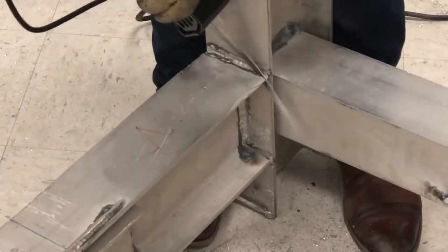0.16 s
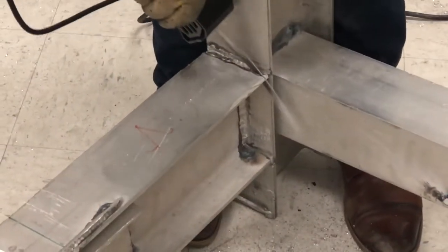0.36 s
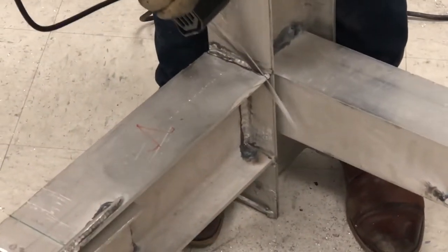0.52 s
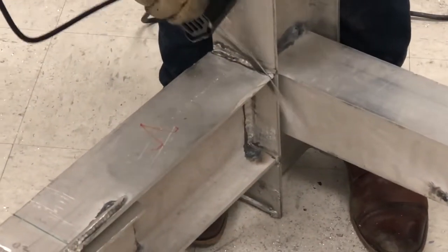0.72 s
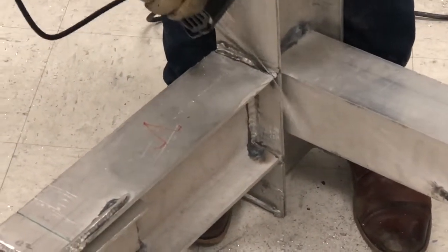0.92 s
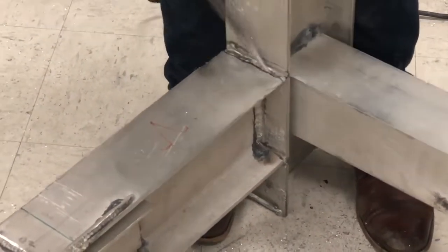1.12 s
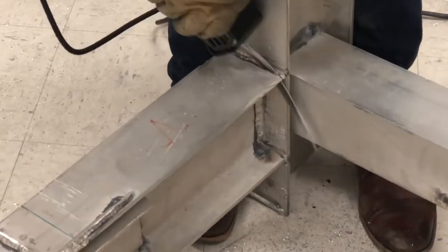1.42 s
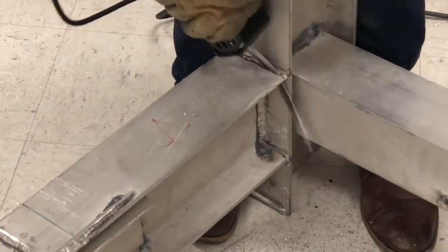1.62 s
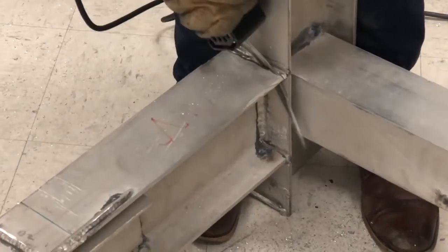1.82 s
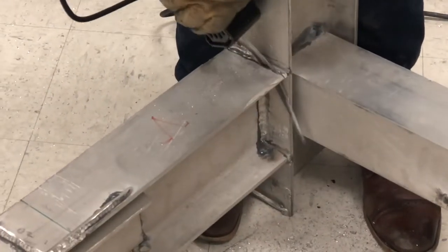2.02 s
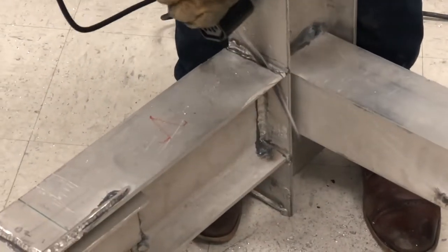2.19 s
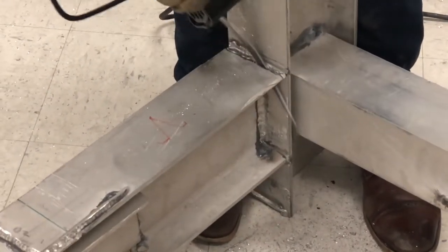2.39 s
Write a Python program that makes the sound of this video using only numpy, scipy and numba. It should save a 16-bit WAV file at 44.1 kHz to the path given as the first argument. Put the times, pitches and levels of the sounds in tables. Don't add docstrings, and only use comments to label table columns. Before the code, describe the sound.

Reciprocating saw blade chatters and squeals through a metal beam, eases off mid-cut, then resumes cutting

```python
import sys
import numpy as np
from scipy import signal
from scipy.fft import rfft, irfft
from scipy.io import wavfile
from scipy.ndimage import uniform_filter1d
from numba import njit

SR = 44100
rng = np.random.default_rng(int(sys.argv[2]) if len(sys.argv) > 2 else 0)


def volts(x):
    e = np.asarray(x, float) / 20
    return 10 ** e


def wav_record(signal):
    frames = np.transpose(np.atleast_2d(signal))
    bounded = np.clip(frames, -1, 1)
    quanta = np.round(bounded * 32767).astype(np.int16)
    wavfile.write(sys.argv[1], SR, quanta)


N = 112454

FULL_PRESSURE_DB = -49.5


def level(x):
    return x / np.sqrt(np.mean(x ** 2))


@njit
def svf(x, hz, width):
    y, band, low = np.empty(len(x)), 0., 0.
    for i in range(len(x)):
        g, damping = np.tan(np.pi * hz[i] / SR), width / hz[i]
        v = (band + g * (x[i] - low)) / (1 + g * (g + damping))
        band, low, y[i] = 2 * v - band, low + 2 * g * v, damping * v
    return y


def fixed_band(x, hz, width_hz):
    return svf(x, np.full(N, float(hz)), float(width_hz))


def walk(rate):
    k = int(SR / rate)
    steps = np.repeat(rng.standard_normal(N // k + 1), k)
    return level(uniform_filter1d(uniform_filter1d(steps, k), k)[:N])


def colour(x, table):
    hz, db = np.array(table, float).T
    f = np.log(np.arange(1, N // 2 + 2) * SR / N)
    outside = np.maximum(np.log(hz[0]) - f, 0) + np.maximum(f - np.log(hz[-1]), 0)
    gain_db = np.interp(f, np.log(hz), db) - 41 * outside * (f < np.log(9000))
    return irfft(rfft(x) * volts(gain_db), N)


def swells(t, table):
    return sum(db * np.exp(-((t - s) / half) ** 2) for s, half, db in table)


def room(x):
    t60_s = 0.31
    t = np.arange(int(.5 * SR)) / SR
    tail = rng.standard_normal(len(t)) * volts(-60 * t / t60_s) * (t > .006)
    return signal.fftconvolve(x, tail / np.sqrt(np.sum(tail ** 2)))[:N]


def blade_strokes(t):
    # time_s, strokes_per_s
    stroke = [
        (0, 83.2),
        (1.05, 82.8),
        (1.3, 84),
        (1.6, 80.6),
        (1.9, 81.2),
        (2.55, 81.8),
    ]
    rate = np.interp(t, *np.array(stroke).T) * (1 + 0.003943 * walk(4))
    return 2 * np.pi * np.cumsum(rate) / SR


def hand_pressure(t):
    # time_s, pressure_db, brightness_db, shake_db
    pressure = [(0.0, -39.5, -5, -21.5), (0.38, -44, -3, -21.5), (0.57, -45.5, -2.5, -16),
                (0.6, -47, -1, -26.5), (0.72, -46, -3.5, -16.5), (0.97, -43.5, -4.5, -21),
                (1.01, -47, -1, -24), (1.06, -46.5, -10.5, -10.5), (1.13, -47, 0, -9),
                (1.18, -46.5, -3, -11.5), (1.3, -58.5, -3.5, -12.5), (1.32, -50, -4.5, -16.5),
                (1.42, -55, -3, -10), (1.54, -46, -1, -16), (1.89, -45.5, -2.5, -17.5),
                (1.98, -44.5, -2, -14.5), (2.29, -44, -3, -15.5), (2.55, -45.5, -3.5, -17)]
    times, *curves = np.array(pressure).T
    return [np.interp(t, times, curve) for curve in curves]


def catches(t):
    # start_s, half_length_s, level_db
    catch_table = [(0.179, 0.017, -3), (.205, 0.011, 2), (0.39, 0.031, 3), (0.5, 0.011, -4),
                   (0.537, 0.016, 2), (0.782, 0.035, 3), (0.823, 0.02, -3.5), (0.845, 0.011, 5),
                   (1.008, 0.018, -3), (1.05, 0.026, 6), (1.133, 0.0065, -7), (1.245, 0.0075, 6),
                   (1.303, 0.0099, -1), (1.427, 0.007, -4.5), (1.838, 0.021, -2), (1.987, 0.023, 0.5),
                   (2.083, 0.014, 1), (2.117, 0.0073, -0.5), (0.457, 0.0086, 2), (2.378, 0.026, 1),
                   (2.444, 0.032, -2)]
    return swells(t, catch_table)


def second_cut(t):
    centre_s, change_s = 1.438, 0.095
    return np.clip(.5 + (t - centre_s) / change_s / 2, 0, 1)


def teeth(phase):
    teeth_per_s, scatter_db, biggest_bite = 9000, 2.5, 2.5
    hit, side, size = rng.random((3, N))
    bite_db = -scatter_db * np.maximum(np.log(1 - size), -biggest_bite)
    clicks = (hit < teeth_per_s / SR) * np.sign(side - .5) * volts(bite_db)
    stroke_db = 1.1 * np.cos(phase) + 1.0 * np.cos(2 * phase)
    return level(clicks * volts(stroke_db))


def rings(drive, modes):
    total = 0
    for hz, width, db in modes:
        fed = drive * volts(2.5 * walk(8.9))
        pitch = np.minimum(hz * (1 + 0.0039 * walk(5.3)), .45 * SR)
        total = total + volts(db) / np.sqrt(width) * svf(fed, pitch, 1. * width)
    return level(total)


def rasp(drive, table):
    x = colour(drive, table)
    low, high = table[0][0], table[-1][0]
    bands = low * 2 ** (np.arange(-1, 3 * np.log2(high / low) + 2) / 3)
    return level(sum(fixed_band(x * volts(1.5 * walk(13.79)), min(f, .45 * SR), f / 2) for f in bands))


def crossfade(first, second, late):
    return np.sqrt(1 - late) * first + np.sqrt(late) * second


def slips(t):
    # start_s, level_db, decay_s
    slip_table = [
        (1.055, -58.5, 0.26),
        (1.13, -65, 0.095),
        (1.5, -61.5, 0.21),
    ]
    rise_s = 0.0088
    env = 0
    for s, db, decay in slip_table:
        fall_db = db - 60 * np.maximum(t - s, 0) / (3 * decay)
        env = env + volts(fall_db) * np.clip((t - s) / rise_s, 0, 1)
    rumble = rng.standard_normal(N) * volts(2 * walk(40.3))
    return env * level(fixed_band(rumble, 386, 520))


def motor_hum(phase, late):
    # stroke_multiple, first_cut_db, second_cut_db
    partials = [(1, -30, -28), (2, -31, -32), (3, -17, -16), (4, -17, -17), (5, -11, -14), (6, -13, -22),
                (7, -15, -12), (8, -17, -15), (9, -26, -16), (10, -14, -14), (11, -16, -13), (12, -16, -13)]
    return sum(volts(a + (b - a) * late + 2.4 * walk(5.13)) * np.sin(k * phase + 6 * rng.random())
               for k, a, b in partials)


def frame_ring(t, bites, late):
    # time_s, pitch_hz
    ring_pitch = [
        (1.5, 491),
        (1.7, 545),
        (1.8, 640),
        (2.0, 660),
        (2.1, 660),
    ]
    ring = level(svf(bites, np.interp(t, *np.array(ring_pitch).T), 30.))
    ends = np.clip((2.1 - t) * 10, 0, 1)
    return late * ends * volts(-3) * ring


def shaken_frame(t, phase, bites, late):
    # frequency_hz, level_db
    frame_colour = [(15, -66), (25, -18), (183, -16), (242, -7), (361, -5.5), (409, -1), (649, 2.5),
                    (769, -2.5), (1000, 4.5), (1300, -22), (2200, -120)]
    rattle = volts(-1) * rasp(teeth(phase), frame_colour)
    return rattle + motor_hum(phase, late) + frame_ring(t, bites, late)


def squeals(t):
    # centre_s, half_length_s, pitch_hz, level_db
    squeal_table = [(.14, .045, 2752, 0), (.14, .03, 2915, -4), (.65, .04, 3113, -9), (.76, .02, 3340, -8),
                    (.4, .025, 1700, -7), (.16, .05, 2005, -7), (.42, .05, 1185, -13),
                    (.56, .045, 1192, -10), (.66, .025, 1192, -12), (.6, .03, 2755, -1),
                    (.76, .06, 2090, -8), (.85, .06, 1195, -9), (.97, .05, 1188, -9), (.96, .03, 2764, -2),
                    (1.07, .04, 2760, -1), (.99, .055, 408, -17), (1.23, .03, 8600, -7),
                    (1.335, .02, 8600, -9), (1.6, .025, 1195, -12), (1.78, .03, 1200, -16),
                    (1.91, .04, 1200, -14), (2.0, .03, 1200, -12), (2.1, .11, 1384, -13),
                    (2.13, .07, 407, -18), (2.41, .04, 1200, -10), (2.46, .1, 407, -16),
                    (2.4, .03, 2355, -7), (.11, .03, 1190, -18), (.09, .08, 415, -22), (.29, .04, 412, -22),
                    (.7, .07, 415, -19), (.25, .06, 835, -20), (.35, .05, 905, -22), (1.67, .03, 540, -18),
                    (1.97, .04, 655, -15), (2.03, .05, 560, -18), (1.8, .17, 243, -24),
                    (2.25, .13, 243, -28), (2.14, .03, 1195, -16), (2.26, .04, 407, -20),
                    (1.63, .03, 3110, -8), (1.68, .02, 3505, -8), (2.07, .03, 3505, -9),
                    (.86, .025, 2355, -8), (.6, .04, 2090, -9), (2.0, .06, 9880, -14),
                    (2.38, .04, 11300, -11)]
    # centre_s, half_length_s, pitch_hz, level_db
    whine = (1.95, .28, 12750, -16)
    total = 0
    for s, half, hz, db in squeal_table + [whine]:
        swell = volts(db) * np.exp(-((t - s) / half) ** 4)
        pitch = hz + 5 * walk(30) * hz / 1200
        grain = volts(1.2 * walk(25) + np.sqrt(hz / 1500) * walk(150))
        total = total + swell * np.sin(2 * np.pi * np.cumsum(pitch) / SR) * grain
    return total


def beam(bites, late, pressure):
    # pitch_hz, width_hz, level_db
    first_modes = [(1190, 30, -12), (1990, 190, -3), (2090, 30, -4), (2355, 30, -5), (2750, 70, -1),
                   (2915, 45, -2), (3113, 30, -5), (3330, 45, -6), (3514, 30, -7.5), (3690, 25, -8.5),
                   (3900, 90, -10)]
    # pitch_hz, width_hz, level_db
    second_modes = [(1206, 40, -8.5), (1524, 16, -6.5), (1795, 35, -2), (2235, 110, 4.5), (2325, 51, -1.5),
                    (2760, 57, 0.5), (3120, 59, -1), (3505, 81, 1.5), (3830, 48, -1)]
    # frequency_hz, level_db
    rasp_colour = [(410, -39), (700, -26), (1090, -17.5), (1180, -5.5), (1460, -5), (2020, 3), (2480, -3.5),
                   (2810, -1), (5000, -13.5), (6500, -28.5), (11000, -120)]
    drive = colour(bites, [(835, 0), (9000, 0)])
    ringing = crossfade(rings(drive, first_modes), rings(drive, second_modes), late)
    damped = bites - late * 0.22 * fixed_band(bites, 2080, 270)
    body = volts(-7.5) * ringing + volts(-4) * rasp(damped, rasp_colour)
    lift_db = -0.4 * np.minimum(pressure - FULL_PRESSURE_DB, 0)
    return body - fixed_band(body, 1140, 570) * (1 - volts(lift_db))


def dull_air(t, top, pressure, catch):
    # start_s, half_length_s, level_db
    spray = [(0.463, 0.013, 2), (.69, .04, 0), (1.104, .035, -9), (1.216, .035, -4), (1.597, 0.11, -3),
             (1.357, .035, -6), (1.403, .008, 6), (1.475, 0.016, -3), (1.78, 0.098, -1), (2.123, .005, 10),
             (2.323, .005, 3), (2.44, 0.044, 2.5)]
    high_pass = signal.butter(2, 10700, "high", fs=SR, output="sos")
    air = signal.sosfilt(high_pass, top[::-1])[::-1]
    air = signal.sosfilt(high_pass, air)
    air_db = .5 * np.minimum(pressure + catch - FULL_PRESSURE_DB, 3) + swells(t, spray)
    return top - air * (1 - volts(air_db))


def blade_and_chips(t, bites, late, pressure, catch):
    # pitch_hz, width_hz, level_db
    first_modes = [(4580, 200, 0), (4920, 80, -5), (5400, 100, -3), (5750, 80, -1), (6020, 120, 0),
                   (7330, 200, -1), (8110, 250, 0), (8700, 400, 3), (10900, 250, -3), (11600, 200, -4)]
    # pitch_hz, width_hz, level_db
    second_modes = [(4590, 140, -2), (5480, 160, -4), (5760, 120, -3), (6580, 120, -3), (8380, 150, -2),
                    (9310, 300, 0), (9880, 120, -4), (11700, 300, -2), (12720, 80, -4)]
    # frequency_hz, level_db
    first_chips = [(2350, -10.5), (4000, -12), (5890, -4.5), (6790, -5), (8930, 0.5), (9890, -3),
                   (11200, -4), (15600, -5.5)]
    # frequency_hz, level_db
    second_chips = [(2350, -44), (4000, -9.5), (6490, -4), (6990, -2.5), (9560, 0), (10800, -5.5),
                    (11700, -2.5), (15600, -4)]
    blade = crossfade(rings(bites, first_modes), rings(bites, second_modes), late)
    chips = crossfade(rasp(bites, first_chips), rasp(bites, second_chips), late)
    return dull_air(t, volts(-7) * blade + volts(-2.5) * chips, pressure, catch)


def scene():
    t = np.arange(N) / SR
    pressure, brightness, shake = hand_pressure(t)
    catch, late, phase = catches(t), second_cut(t), blade_strokes(t)
    bites = teeth(phase)

    frame = shaken_frame(t, phase, bites, late) * volts(shake)
    body = beam(bites, late, pressure) * volts(0.62 * catch)
    top = blade_and_chips(t, bites, late, pressure, catch) * volts(brightness + 1.58 * catch)
    saw = volts(pressure) * (body + top + frame) + slips(t)
    sing = volts(pressure) * squeals(t)
    return (saw + sing + volts(-5) * room(saw + .4 * sing))[None]


def band_limit(x):
    return signal.sosfilt(signal.butter(12, 16820, fs=SR, output="sos"), x)


def record(dry):
    low_hz, top_hz = 90, 15720
    f = np.arange(N // 2 + 1) * SR / N
    heard = irfft(rfft(dry) * (f < top_hz) * f / np.hypot(f, low_hz), N)
    return band_limit(heard)


dry = scene()
out = record(dry)
wav_record(out)
```